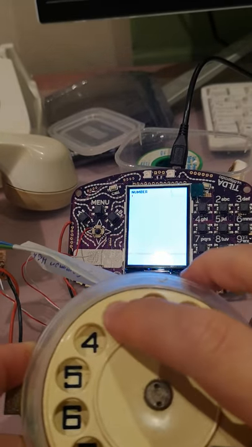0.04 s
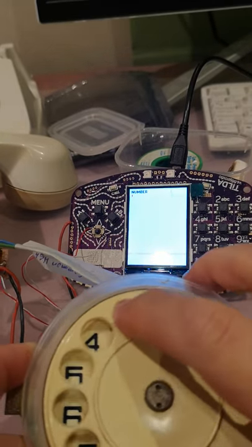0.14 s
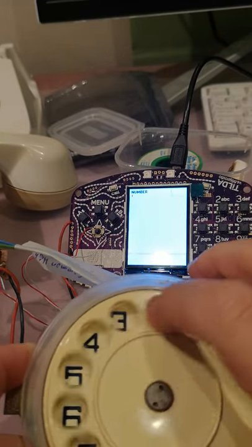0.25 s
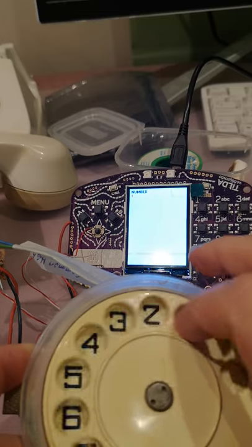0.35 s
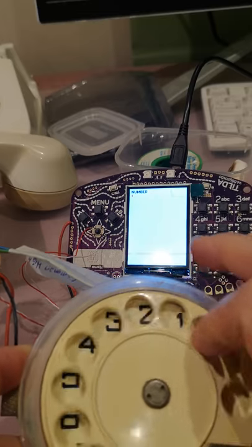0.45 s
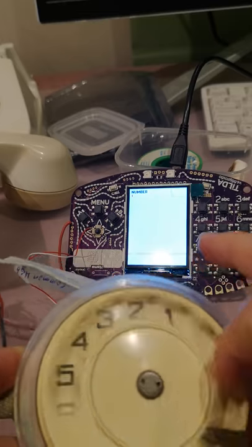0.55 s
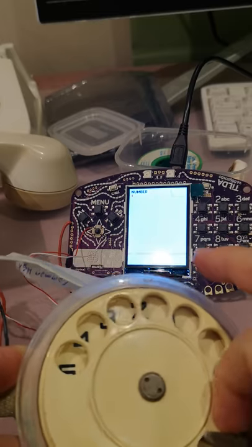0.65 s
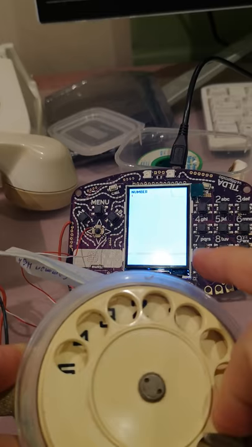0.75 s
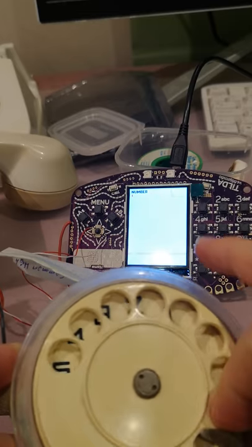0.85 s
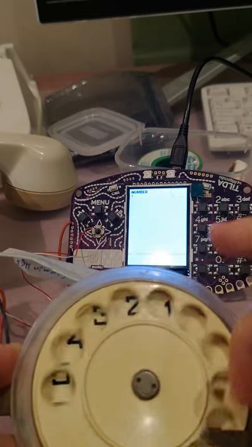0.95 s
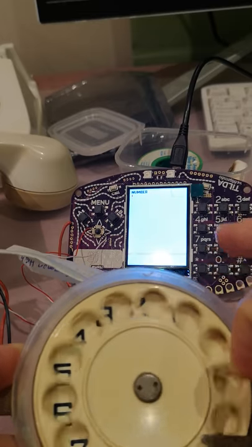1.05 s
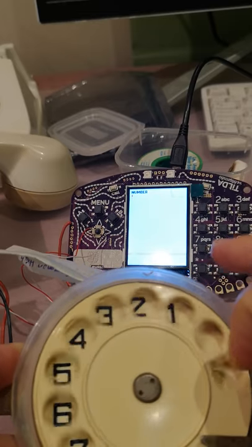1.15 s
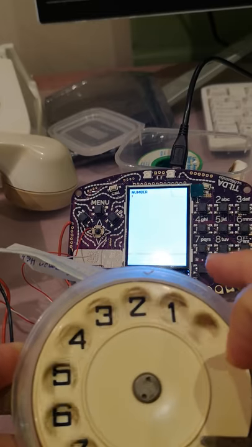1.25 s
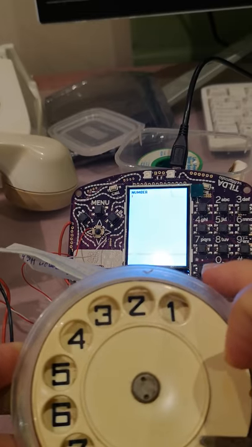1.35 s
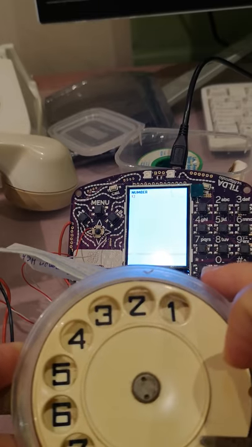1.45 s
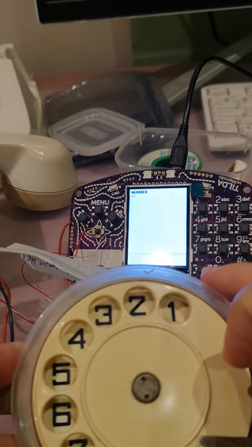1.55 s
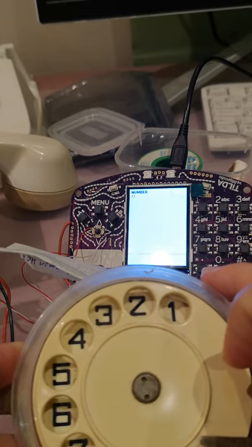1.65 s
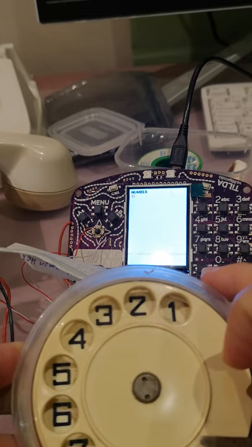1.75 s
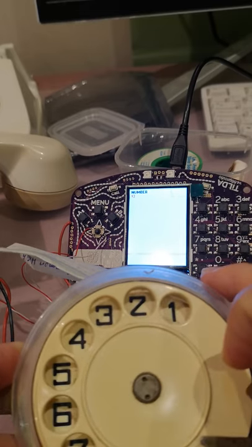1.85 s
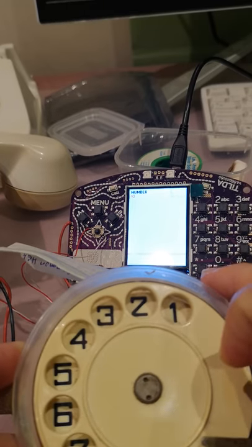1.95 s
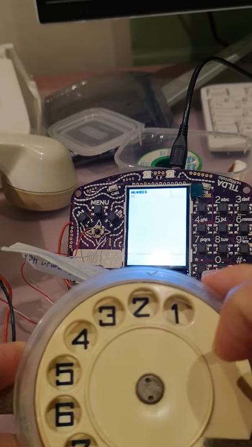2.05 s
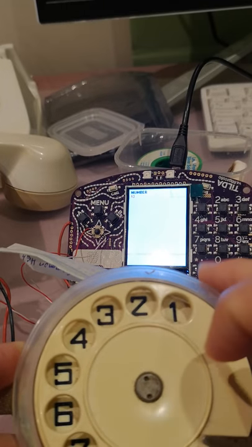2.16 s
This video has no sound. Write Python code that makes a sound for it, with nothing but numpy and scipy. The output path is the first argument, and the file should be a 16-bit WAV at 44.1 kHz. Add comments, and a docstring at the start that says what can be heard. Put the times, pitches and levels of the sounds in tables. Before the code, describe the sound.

A rotary telephone dial is wound with ratchety clicks, then whirrs back and knocks to a stop

```python
"""A rotary telephone dial, close to the microphone in a quiet room, dials one digit.
Low rumble, faint hum and hiss lie under it. A finger touches the wheel and winds it: gears rub, pawl and spring
click, skin squeaks, the finger stop knocks. The finger lets go with a squeak, a knock and a click; the governor
whirrs (rubbing gears, scratching shoes, short groans, a few clicks) while the wheel runs back. The wheel knocks on
its stop and the ratchet coasts out in slowing clicks. Contacts are coloured noise; spring and stop decaying sines."""
import sys
import numpy as np
from scipy import signal
from scipy.fft import rfft, irfft
from scipy.io import wavfile

SR = 44100
rng = np.random.default_rng(int(sys.argv[2]) if len(sys.argv) > 2 else 0)


def pcm_store(signal):
    """Save signal as 16-bit PCM."""
    levels = np.round(np.clip(np.atleast_2d(signal), -1, 1) * 32767)
    wavfile.write(sys.argv[1], SR, levels.astype(np.int16).T)


N = 97020
T = np.arange(N) / SR
LIKENESS = 0.52  # shared power fraction of the two channels' contact noise


def undb(db):
    """Decibels to gain."""
    return 10 ** (np.asarray(db) / 20)


def unit(x):
    """Scale to rms 1."""
    return x / np.sqrt(np.mean(x ** 2))


def along(rows, column=1):
    """Gain over time from a dB curve that fades out beyond its ends."""
    r = np.array(rows)
    start_s, end_s = r[0, 0], r[-1, 0]
    gate = np.interp(T, [start_s - .01, start_s, end_s, end_s + .01], [0, 1, 1, 0])
    return undb(np.interp(T, r[:, 0], r[:, column])) * gate


def gains(points, size):
    """Gain of a (freq_hz, level_db) curve at each transform frequency, interpolated over log frequency."""
    p = np.array(points)
    log_hz = np.log(np.fft.rfftfreq(size, 1 / SR) + 1)
    return undb(np.interp(log_hz, np.log(p[:, 0]), p[:, 1]))


def through(x, response):
    """Convolve each channel."""
    return signal.fftconvolve(np.atleast_2d(x), np.atleast_2d(response), axes=1)[:, :N]


def colour(x, points, size=1024):
    """Minimum-phase filter of unit energy with the given spectral shape."""
    cepstrum = irfft(np.log(gains(points, size)))
    cepstrum[1:size // 2] *= 2
    cepstrum[size // 2 + 1:] = 0
    response = irfft(np.exp(rfft(cepstrum)))
    return through(x, response / np.linalg.norm(response))


def pair(likeness):
    """Two partly alike noises."""
    noise = rng.standard_normal((3, N))
    return np.sqrt(likeness) * noise[0] + np.sqrt(1 - likeness) * noise[1:]


def burst(start_s, rise_s, hold_s, fall_s):
    """Envelope of one short contact: linear rise, hold, exponential fall."""
    age_s = T - start_s
    fall = np.exp(-np.clip((age_s - rise_s - hold_s) / fall_s, 0, 20))
    return np.clip(age_s / rise_s, 0, 1) * fall


def ring(start_s, modes, rise_s, detune=1, sag=0, settle_s=.004, size=16384):
    """Decaying modes struck at one moment; with sag they start sharp and settle."""
    out, i, t = np.zeros(N + size), int(start_s * SR), T[:size]
    clock = detune * t + sag * settle_s * (1 - np.exp(-t / settle_s))
    tones = 0
    for (hz, db, t60_s), turn in zip(modes, rng.random(len(modes))):
        decay = np.exp(-np.log(1000) * t / t60_s)
        tones = tones + undb(db) * np.sin(2 * np.pi * (hz * clock + turn)) * decay
    out[i:i + size] = tones * np.clip(t / rise_s, 0, 1)
    return out[:N]


def resonance(x, hz, width_hz):
    """One resonance driven by x, rms 1."""
    return unit(signal.lfilter(*signal.iirpeak(hz, hz / width_hz, fs=SR), x))


# room background spectrum: freq_hz, density_rel_db
FLOOR_SPECTRUM = [(12, -20.5), (20, 5), (35, -7), (55, -18.5), (154, -20.5), (193, -14), (241, -28.5),
                  (280, -28.5), (337, -34.5), (700, -52.5), (2080, -52.5), (16000, -73.5)]
# rumble level: time_s, level_rel_db
RUMBLE_LEVEL = [(0.0, -45), (0.42, -41.5), (0.5, -45), (1.13, -45.5), (1.16, -43.5), (1.59, -50.5),
                (1.83, -56), (1.86, -54.5), (2.2, -54.5)]
RUMBLE_DB, AIR_DB, HUM_DB = -1, -72, -75
RUMBLE_EDGE_HZ, WIDE_HZ = 487, 900
HUM_HZ, HUM_WANDER_RAD = 189, 0.14  # rms phase drift per 0.05 s


def background():
    """Low rumble that dies down, alike in both ears at the bottom; a faint wavering hum and thin hiss."""
    hz = np.fft.rfftfreq(N, 1 / SR)
    shape = gains(FLOOR_SPECTRUM, N)
    low = 1 / (1 + (hz / RUMBLE_EDGE_HZ) ** 4)
    mid, side = rfft(rng.standard_normal((2, N)))
    spread = mid + np.array([[1], [-1]]) * side * np.minimum(hz / WIDE_HZ, 1)
    rumble = unit(irfft(spread * shape * low, N)) * along(RUMBLE_LEVEL) * undb(RUMBLE_DB)
    air = unit(irfft(rfft(pair(0.045)) * shape * (1 - low), N)) * undb(AIR_DB)
    drift_rad = np.cumsum(rng.standard_normal(N)) * np.sqrt(20 / SR) * HUM_WANDER_RAD
    hum = unit(np.sin(2 * np.pi * HUM_HZ * T + drift_rad))
    return rumble + air + undb(HUM_DB) * hum


CHATTER_JITTER, CHATTER_SPREAD_DB = .25, 0.5  # log-interval sd; soft limit of contact level


def chatter(hz, fall_s, count=1000):
    """Uneven train of tiny contacts at about hz per second, as an envelope of rms 1."""
    chance = rng.standard_normal((count, 2))
    at = (np.cumsum(np.exp(CHATTER_JITTER * chance[:, 0])) / hz * SR).astype(int)
    ticks = np.bincount(at, undb(CHATTER_SPREAD_DB * np.tanh(chance[:, 1])), N)[:N]
    return unit(signal.lfilter([1], [1, -np.exp(-1 / (fall_s * SR))], ticks))


FLUTTER_HZ, FLUTTER_DB = 45.74, 5  # random points per second; depth scale


def flutter(count=400):
    """Quick random swelling and fading, rms 1."""
    points = rng.uniform(-1.2, 1, count)
    return unit(undb(FLUTTER_DB * np.interp(T * FLUTTER_HZ, np.arange(count), points)))


# gears rubbing while the finger winds: time_s, level_rel_db
WIND = [(.17, -76), (.22, -78.5), (.31, -46.5), (.40, -50), (.50, -53), (.58, -52.5), (.645, -46.5),
        (.67, -51.5), (.70, -49.5), (.73, -54.5)]
# wheel running back: time_s, gear_rub_rel_db, shoe_scratch_rel_db
RUN = [(0.99, -47, -72), (0.998, -54.5, -53.5), (1.022, -46.5, -59.5), (1.028, -44.5, -43),
       (1.048, -40, -34.5), (1.058, -46, -62), (1.074, -40, -36.5), (1.096, -40.5, -32), (1.11, -39, -54.5),
       (1.12, -45, -42.5), (1.142, -39, -34.5), (1.16, -42.5, -49.5), (1.188, -42.5, -46.5),
       (1.198, -44, -36), (1.228, -44, -64), (1.234, -48, -44), (1.248, -42.5, -36), (1.272, -42, -66.5),
       (1.282, -41, -40.5), (1.328, -41.5, -45), (1.37, -43.5, -40.5), (1.402, -47, -43.5)]
# governor spinning down after the wheel stops: time_s, gear_rub_rel_db, shoe_scratch_rel_db
COAST = [(1.425, -44, -58), (1.50, -48, -57), (1.552, -55, -55.5), (1.60, -64, -70)]
# gear rub spectrum: freq_hz, level_rel_db
RUB_SPECTRUM = [(450, -27.5), (750, -7), (1070, 6), (1400, 2), (2000, 1), (2700, 4), (3500, 1),
                (4400, -6.5), (5600, -11.5), (9000, -36.5)]
# brake shoe spectrum: freq_hz, level_rel_db
SCRATCH_SPECTRUM = [(2500, -30), (4200, -14), (5600, -5.5), (7000, 6), (8000, 8.5), (9300, -0.5),
                    (10800, -11), (14500, -19), (16000, -26.5)]
# case resonances excited by the gears: freq_hz, width_hz, level_rel_db
CASE_MODES = [(1073, 45, -3.5), (1250, 300, -15), (1710, 600, -14.5), (2480, 200, -6), (2830, 140, -1.5),
              (2780, 100, -6), (3740, 250, -7), (5920, 150, -12)]
RUB_DB, SCRATCH_DB, CASE_DB = 4.5, -0.5, -3.5
TOOTH_HZ, TOOTH_FALL_S, RUB_STEADY = 248.3, 0.0024, 2.5
SHOE_HZ, SHOE_FALL_S, SCRATCH_STEADY = 95, .0028, .25


def governor():
    """Gear teeth rub evenly and stir the case; the brake shoes scratch round their cup in quick tiny contacts."""
    run = np.vstack([RUN, COAST])
    teeth = chatter(TOOTH_HZ, TOOTH_FALL_S)
    drive = undb(RUB_DB) * along(run) + along(WIND)
    mesh = unit(teeth + RUB_STEADY)
    rub = colour(mesh * drive * pair(LIKENESS), RUB_SPECTRUM) / np.sqrt(2)
    case = 0
    for hz, width_hz, db in CASE_MODES:
        mode = resonance(mesh * rng.standard_normal(N), hz, width_hz)
        case = case + undb(db) * flutter() * mode
    case = undb(CASE_DB) * drive * unit(case) / np.sqrt(2)
    contacts = unit(chatter(SHOE_HZ, SHOE_FALL_S) + SCRATCH_STEADY)
    contacts = contacts * undb(SCRATCH_DB) * along(run, 2)
    grit = unit(np.tanh(2 * pair(LIKENESS / 2)))
    return rub + case + colour(contacts * grit, SCRATCH_SPECTRUM)


# finger touching the wheel: start_s, level_rel_db, fall_s
TOUCHES = [(0.1836, -62, 0.015), (0.837, -71, 0.014)]
# touch spectrum: freq_hz, level_rel_db
TOUCH_SPECTRUM = [(500, -14), (800, 7.5), (1200, -8.5), (1900, 1), (2700, -5), (3600, 0), (5000, -14.5),
                  (12000, -29)]
TOUCH_RISE_S = 0.0027  # also the hold


def touches():
    """The fingertip brushes the plastic: faint short noise bursts."""
    contact = sum(undb(db) * burst(start_s, TOUCH_RISE_S, TOUCH_RISE_S, fall_s)
                  for start_s, db, fall_s in TOUCHES)
    return colour(contact * pair(LIKENESS), TOUCH_SPECTRUM)


# pawl and spring clicks while winding, at the release, running back and coasting:
# start_s, snap_rel_db, spring_ring_rel_db
CLICKS = [(0.2099, -4.5, -7), (0.2355, -3, -16), (0.2532, -3, -8), (0.2738, -3, -8), (0.2889, -1, -6.5),
          (0.303, -2.5, -15.5), (0.3115, -3, 1), (0.327, 0, -30), (0.3363, -1, -13), (0.3523, -1.5, -26),
          (0.3635, -2.5, -10), (0.3805, -2, -18.5), (.3915, 0.5, -26), (0.4, -10, -18.5), (.4203, 0, -20.5),
          (0.435, 0.5, -13.5), (0.4626, -1.5, -6.5), (0.4778, 1.5, -9), (0.5056, 0.5, -9.5),
          (.5162, 2.5, -3), (.5392, -5.5, -15.5), (0.5482, -2.5, -6.5), (0.5677, 1, -7),
          (0.5743, -3.5, -1.5), (0.589, -5, -7.5), (0.5954, -4, -2), (0.6051, 4, -9), (0.6088, 1.5, -2),
          (0.6183, -7.5, -4.5), (0.6206, 1.5, -18.5), (0.6262, 0, 6), (.6338, 3, -0.5), (.6405, -3.5, -7.5),
          (.6453, 2, 7), (0.648, -14, -9), (0.6582, -7.5, -15.5), (0.705, -3, -8), (0.9512, -14, 0),
          (0.9978, -15, -11.5), (1.0346, -11.5, -2), (1.2005, -3.5, -1), (1.2815, -1, -4.5),
          (1.431, 1, -9.5), (1.442, -6.5, 0.5), (1.457, -0.5, -3), (1.4703, -1.5, 4), (1.4877, 1.5, -7.5),
          (1.5048, -2.5, 3.5), (1.5263, 1, -6.5), (1.546, -1.5, 4), (1.5737, -2, -3), (1.6084, -1, 2)]
# snap spectrum in the mechanism: freq_hz, level_rel_db
SNAP_SPECTRUM = [(450, -32), (800, -20), (1100, -3.5), (1400, -12.5), (2200, -10), (2650, -4.5), (2900, 0),
                 (3150, -5.5), (3450, 6.5), (3700, 4.5), (3950, -1), (4450, 3.5), (4850, -1.5),
                 (5700, -8.5), (6500, -11.5), (7050, -2.5), (7700, 2), (8300, -4), (9300, -4.5),
                 (11500, -20.5), (13800, -22.5), (15000, -15.5)]
# pawl spring modes, nominal: freq_hz, level_rel_db, t60_s
SPRING_MODES = [(2500, -17, .02), (2920, 0, .029), (3420, -7, .03), (3570, -.5, .023), (4060, -14, .025),
                (4650, -14, .02), (4980, -13, .02), (7650, -14, .018)]
SNAP_DB, SNAP_RISE_S, SNAP_HOLD_S, SNAP_FALL_S = -29.5, 0.00076, 0.0016, 0.0017
SPRING_DB, SPRING_RISE_S, SPRING_VARY_DB = -28.5, .0015, 2
SPRING_SPREAD, SPRING_SAG = .013, .03  # fractions of frequency
# once the finger lets go the pawl no longer shakes the case, and its snaps lose their body
RELEASE_S, BODY_HZ, FREE_BODY_DB = .95, 2300, -10


def ratchet():
    """Each click is a scraping snap and a ring of the spring, a little different each time, sinking as it settles."""
    power = sum((undb(db) * burst(start_s, SNAP_RISE_S, SNAP_HOLD_S, SNAP_FALL_S)) ** 2
                for start_s, db, _ in CLICKS)
    scrape = unit(np.tanh(2 * pair(LIKENESS)))
    snaps = colour(np.sqrt(power) * scrape, SNAP_SPECTRUM)
    body = signal.sosfiltfilt(signal.butter(4, BODY_HZ, fs=SR, output="sos"), snaps)
    snaps = snaps - body * (T > RELEASE_S) * (1 - undb(FREE_BODY_DB))
    spring = 0
    for start_s, _, db in CLICKS:
        detune = 1 - SPRING_SPREAD * np.abs(rng.standard_normal())
        modes = [(hz, level + SPRING_VARY_DB * rng.uniform(-1.4, 1), t60_s)
                 for hz, level, t60_s in SPRING_MODES]
        spring = spring + undb(db) * ring(start_s + SPRING_RISE_S / 2, modes, SPRING_RISE_S,
                                          detune, SPRING_SAG, size=3000)
    return undb(SNAP_DB) * snaps + undb(SPRING_DB) * spring


# squeaks as the finger drives the wheel home and slips out: start_s, length_s, level_rel_db
SQUEAKS = [(0.617, 0.037, -35), (0.9475, .011, -40)]
# wheel resonances: freq_hz, width_hz, level_rel_db
WHEEL_MODES = [(2220, 150, -14), (2420, 200, -2.5), (2690, 200, 1), (3394, 140, 1.5), (7170, 78, -7),
               (9650, 90, -19)]


def squeak():
    """Skin slips on the plastic and stirs the narrow resonances of the wheel."""
    swell = 0
    for start_s, length_s, db in SQUEAKS:
        arch = np.abs(np.sin(np.pi * np.clip((T - start_s) / length_s, 0, 1)))
        swell = swell + undb(db) * np.sqrt(arch)
    tone = 0
    for hz, width_hz, db in WHEEL_MODES:
        once = resonance(rng.standard_normal(N), hz, width_hz)
        tone = tone + undb(db) * resonance(once, hz, 2 * width_hz)
    return swell * tone


# wheel knocks (finger stop, release, end stop): start_s, blow_rel_db, fall_s, stop_ring_rel_db
KNOCKS = [(0.6495, -38, 0.0018, -64), (0.9512, -36.5, .004, -36.5), (1.4115, -24.5, 0.00089, -56),
          (1.4194, -43, 0.0025, -52)]
# knock spectrum: freq_hz, level_rel_db
KNOCK_SPECTRUM = [(350, -44.5), (700, -14), (1050, -0.5), (1350, -2), (1950, -0.5), (2700, -7), (3500, -8),
                  (5200, -15.5), (7700, -11.5), (11000, -30), (15000, -35)]
# metal stop modes: freq_hz, level_rel_db, t60_s
STOP_MODES = [(1168, 0, .17), (2266, -22, .1)]
KNOCK_RISE_S, KNOCK_HOLD_S = .0003, 0.0024
PUSH_DB, CRUNCH_DB = 20.5, -1.5  # first hard contact; crunch with it


def knocks():
    """The plastic wheel knocks, one hard push and a short crunch, and sets the metal stop ringing."""
    at = [int(k[0] * SR) for k in KNOCKS]
    push = np.bincount(at, undb([k[1] + PUSH_DB for k in KNOCKS]), N)
    crunch = sum(undb(db + CRUNCH_DB) * burst(start_s, KNOCK_RISE_S, KNOCK_HOLD_S, fall_s)
                 for start_s, db, fall_s, _ in KNOCKS)
    blows = colour(push + crunch * unit(np.tanh(pair(LIKENESS))), KNOCK_SPECTRUM)
    stop = sum(undb(db) * ring(start_s, STOP_MODES, KNOCK_HOLD_S) for start_s, _, _, db in KNOCKS)
    return blows + stop


# gear train groans: start_s, length_s, pitch_hz, level_db
GROANS = [(1.229, 0.009, 1093, -31.5), (1.288, 0.017, 1077, -40), (1.322, 0.018, 1036, -38.5),
          (1.364, 0.018, 1071, -38)]


def groans():
    """The gear train catches for a few cycles near the resonance of the case: short swelling sines."""
    out = 0
    for start_s, length_s, hz, db in GROANS:
        swell = np.sin(np.pi * np.clip((T - start_s) / length_s, 0, 1))
        out = out + undb(db) * swell * np.sin(2 * np.pi * hz * T)
    return out


def reflections(x, db, fall_s, size=26000):
    """Diffuse decaying reflections, different at each microphone."""
    t = T[:size]
    h = rng.standard_normal((2, size)) * np.exp(-t / fall_s) * np.clip(t / 0.0012, 0, 1)
    return undb(db) * through(x, h / np.linalg.norm(h, axis=1, keepdims=True))


# direct sound, left minus right: freq_hz, level_db
BALANCE_LR = [(700, -2), (1300, -1.5), (2400, 3), (3500, 11), (4100, 2.5), (4700, 9), (5800, 3), (7500, 13),
              (8600, 3.5), (9500, -9), (11000, -0.5), (15000, 1.5)]
# phase by which the left microphone leads: freq_hz, lead_rad
LEAD = [(700, -.4), (1100, -.3), (2150, .3), (3300, -.3), (4600, -1.7), (6300, -2.8), (8000, -2.6),
        (9500, -2.2), (15000, -2.2)]
# room tail spectrum: freq_hz, level_rel_db
ROOM_SPECTRUM = [(1000, -0.5), (2000, 4.5), (2700, 3), (2950, -11.5), (3300, -6.5), (3600, 2), (4000, 5.5),
                 (4600, 0.5), (6500, 3), (7700, 2), (10000, 3.5)]
ROOM_DB, ROOM_T60_S, DESK_DB, DESK_FALL_S = -14, 0.2, -8.5, 0.015


def scene():
    """The dial, a little to the left, with desk and room reflections over the background."""
    dial = governor() + groans() + knocks() + ratchet() + squeak() + touches()
    lead_rad = np.interp(np.fft.rfftfreq(N, 1 / SR), *np.array(LEAD).T)
    side = np.sqrt(gains(BALANCE_LR, N)) * np.exp(1j * lead_rad / 2)
    direct = irfft(rfft(dial) * np.array([side, 1 / side]), N)
    desk = reflections(dial, DESK_DB, DESK_FALL_S)
    to_room = irfft(rfft(dial) * gains(ROOM_SPECTRUM, N), N)
    room = reflections(to_room, ROOM_DB, ROOM_T60_S / np.log(1000))
    return direct + desk + room + background()


TOP_HZ = 15350


def record(dry):
    """The recorder cuts the top: steep elliptic low-pass."""
    return signal.sosfilt(signal.ellip(8, .2, 70, TOP_HZ, fs=SR, output="sos"), dry)


dry = scene()
out = record(dry)
pcm_store(out)
```